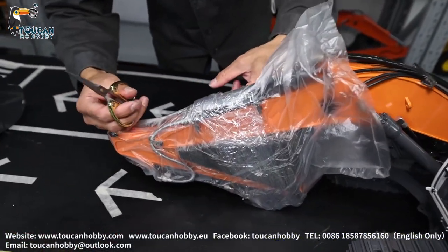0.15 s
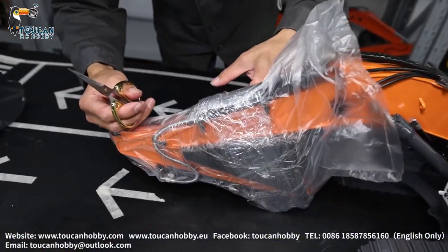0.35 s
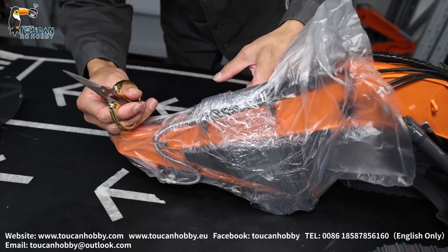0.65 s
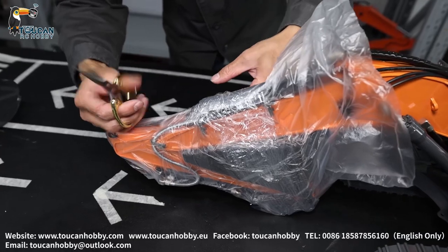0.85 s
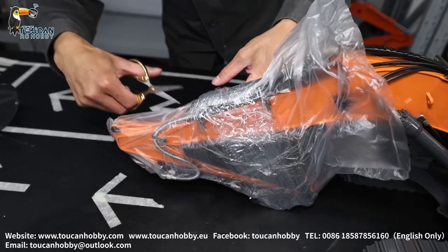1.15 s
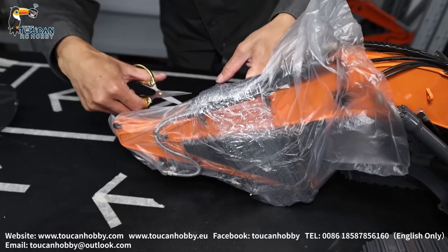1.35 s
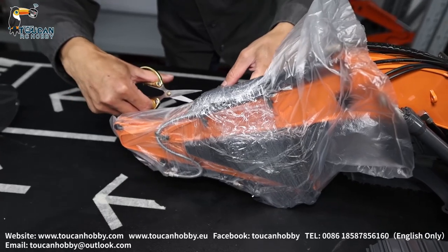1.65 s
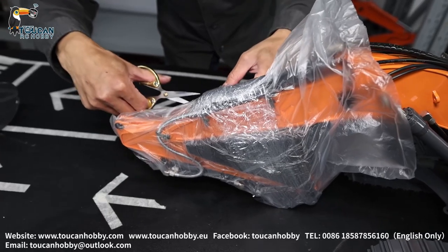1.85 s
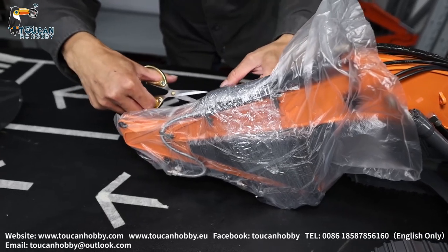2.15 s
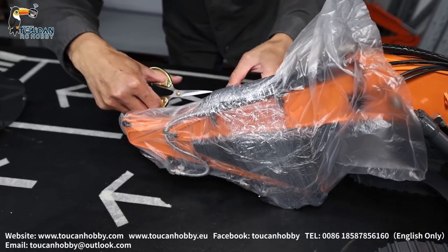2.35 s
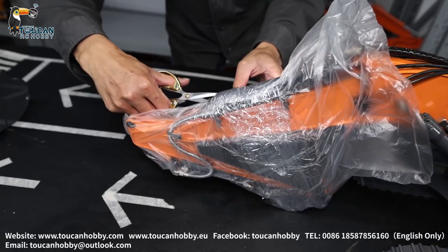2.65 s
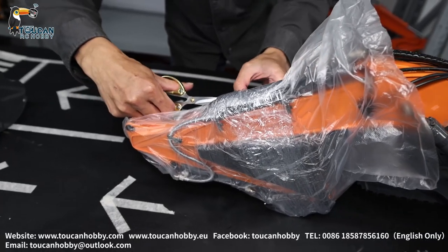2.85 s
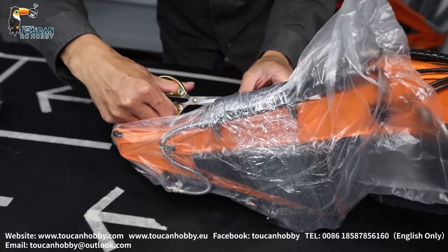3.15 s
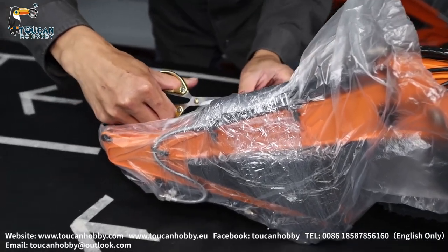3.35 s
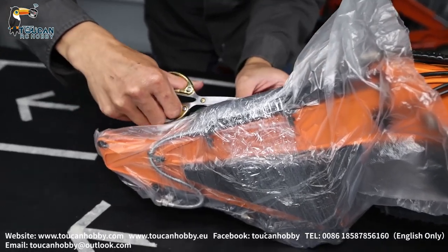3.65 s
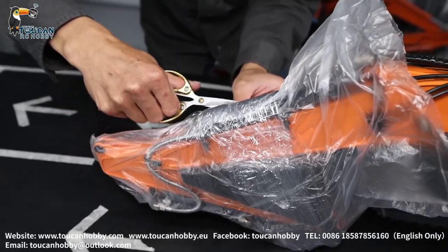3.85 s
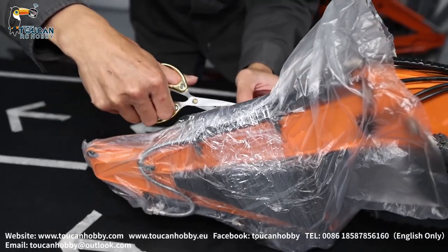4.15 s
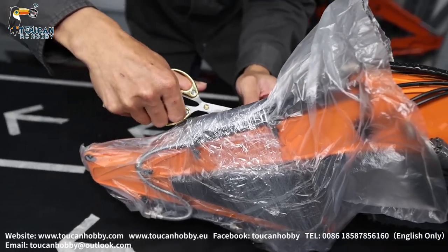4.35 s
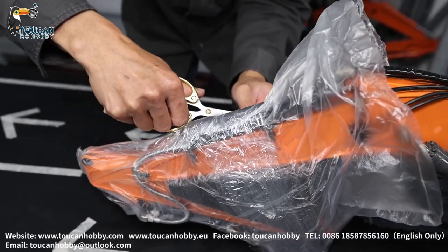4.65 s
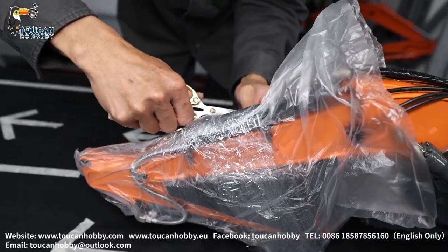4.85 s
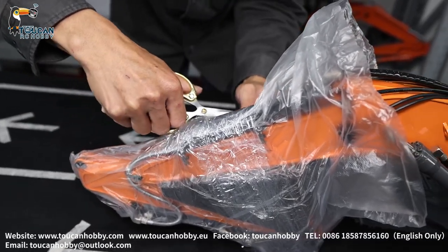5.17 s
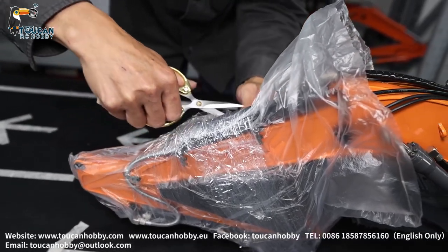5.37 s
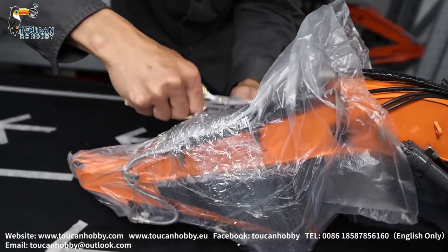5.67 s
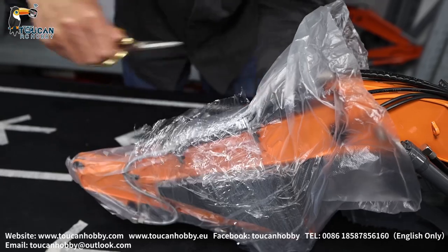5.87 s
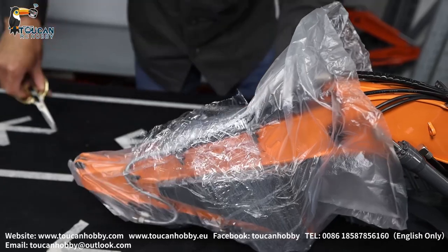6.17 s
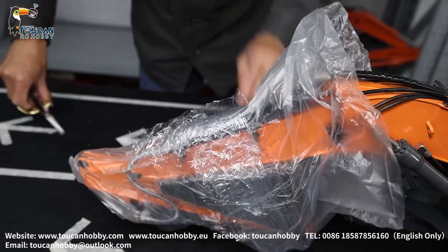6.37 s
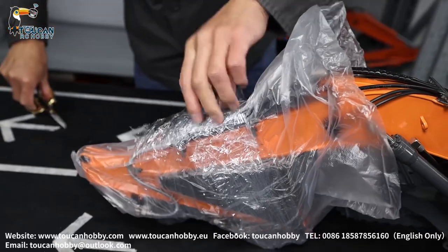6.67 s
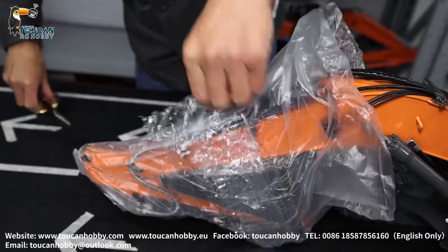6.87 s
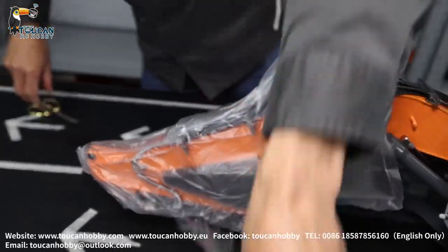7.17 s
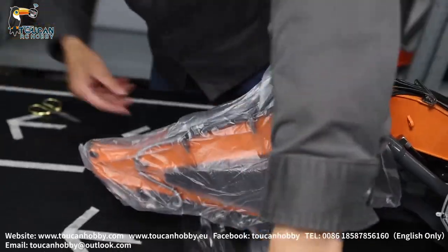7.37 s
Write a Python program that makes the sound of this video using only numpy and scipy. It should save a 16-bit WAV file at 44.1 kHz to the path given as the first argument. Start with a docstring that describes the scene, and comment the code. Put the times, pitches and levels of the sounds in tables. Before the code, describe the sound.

Very close, thin plastic film crackles over a hollow plastic shell in dense swarms of tiny bright snaps, with sharper pops and a few dull knocks. Past the middle, scissor blades clack shut and the loose film rattles. Near the end a palm drags the wrap with a low, short, sinking groan. Small workshop, faint tail, soft steady noise beneath.

```python
"""Scissors slit thin plastic wrap over a hollow plastic shell: from the start the film crinkles in swarms
of tiny snaps (noise bursts) with a few loud ones, while scissors and knuckles knock on the shell.
Past the middle the blades clack shut (ringing modes) and the loose film rattles. Near the end a palm
drags the wrap with a sinking groan. Rubbing noise, an echo that shifts, a faint room tail, a steady
noise floor and low air movement run throughout."""
import sys
import numpy as np
from scipy import signal
from scipy.fft import rfft, irfft, next_fast_len
from scipy.io import wavfile
from scipy.ndimage import uniform_filter1d, map_coordinates

SR = 44100
rng = np.random.default_rng(int(sys.argv[2]) if len(sys.argv) > 2 else 0)


def log_audio(samples):
    """Write samples as a 16-bit WAV file to the path given in sys.argv[1]."""
    # one column per channel
    frames = np.atleast_2d(samples).T
    # limit to full scale, then quantise
    limited = np.clip(frames, -1, 1)
    pcm = np.round(limited * 32767).astype(np.int16)
    wavfile.write(sys.argv[1], SR, pcm)


N = 331632
TIME = np.arange(N) / SR


# colour of the crinkling film [f/Hz, relative level/dB]
FILM_COLOUR = [(300, -8.5), (1000, -9), (1500, -5), (2100, -5), (3000, -2), (5000, -1.5), (7500, -1),
               (10000, -3.5), (12500, -6.5), (16000, -12.5)]
# balance of crease sizes [t/s, broad level/dB, fine level/dB], before the mix; middle creases are at 0
CREASE_BALANCE = [(0, -5.5, 0.5), (.44, -5.5, -1.5), (1.19, -3.5, 0), (1.95, -2.5, 0), (2.12, 2.5, 3.5),
                  (2.7, -5.5, 3.5), (2.89, 1.5, -1), (3.1, -10.5, 0.5), (4.05, 0.5, 3.5), (4.29, -8.5, 1),
                  (4.46, 3, -2), (5.1, -6.5, 2), (6.13, -9, 2.5), (6.58, 2, -.5), (6.73, -1, 1),
                  (6.93, 6.5, 12.5), (7.05, 6.5, 5.5), (7.52, -0.5, -1.5)]
# stretched pleat that rings under blade and fingers [t/s, f/Hz, level/dB against the middle creases]
PLEAT_RINGING = [(0, 3680, -7), (.95, 3200, -11.5), (1.35, 2290, -2.5), (1.6, 2880, -7), (2.6, 2730, -2),
                 (3.3, 2510, -6.5), (4.5, 2940, -11), (4.85, 3670, -6), (5.5, 3700, 1), (6.5, 3560, -5.5),
                 (6.98, 3200, -36), (7.035, 2406, 8), (7.1, 2190, 0), (7.5, 2320, -17)]
# whisper of steel or skin along taut film [t/s, f/Hz, level/dB against the middle creases]
TAUT_WHISPER = [(0, 5330, -10), (.45, 6000, -7), (.65, 8500, -21), (1.0, 9800, 4), (1.6, 10150, 0),
                (2.0, 10300, 4.5), (2.4, 10600, -15), (3.1, 5600, -11), (3.55, 5300, -6.5),
                (4.2, 4600, -11.5), (4.6, 4430, -27), (6.6, 6500, -11), (6.74, 7360, 7.5),
                (6.95, 10500, -5), (7.4, 7600, 0)]


def crinkle(snaps, level_db, own_share):
    """Broad creases sound low, fine ones high; some snaps reach all sizes, others only one."""
    share = np.clip(own_share, 0, 1)

    def creases(hz, kind):
        """Snaps of one size of crease: filtered film noise under a shared and a private envelope."""
        own = swarm(per_s=1100, spread_db=5.0, clump_db=4.0, fade_s=0.00046, smooth_share=0.021)
        echoed = glance(noise(FILM_COLOUR), scale=0.5)
        colour = evened(passed(echoed, hz, kind, order=4), size=4000)
        return colour * np.sqrt((1 - share) * snaps ** 2 + share * own ** 2)

    broad, fine = from_db(in_time(CREASE_BALANCE))
    pleat_hz, pleat_db = in_time(PLEAT_RINGING)
    whisper_hz, whisper_db = in_time(TAUT_WHISPER)
    pleat, whisper = from_db(pleat_db), from_db(whisper_db)
    # the stronger snaps set the pleat ringing most, and its pitch shifts as it folds
    folding = 1 + .07 * rms_one(passed(rng.standard_normal(N), 50, "low"))
    struck_pleat = snaps ** 1.5 * noise(FILM_COLOUR)
    ringing = evened(gliding(struck_pleat, pleat_hz * folding, width_hz=550), size=3000)
    sliding = rms_one(gliding(snaps * noise(FILM_COLOUR), whisper_hz, width_hz=1300))
    voice = broad * creases(4240, "low")
    voice = voice + creases([4500, 8500], "band")
    voice = voice + 0.92 * fine * creases(9060, "high")
    voice = voice + pleat * ringing + whisper * sliding
    # keep the level steady as the balance changes
    balance = np.sqrt(1 + broad ** 2 + (1.015 * fine) ** 2 + pleat ** 2 + whisper ** 2)
    return from_db(strain() + level_db) * voice / balance


def swarm(per_s, spread_db, clump_db, fade_s, smooth_share):
    """Envelope of tiny snaps: they come in clumps, vary widely in size and die at once."""
    clumps = from_db(clump_db * rms_one(passed(rng.standard_normal(N), 60, "low")))
    # film that is barely worked gives few, separate snaps; worked hard, they run together
    activity = from_db(.9 * (strain() + 46))
    born = rng.random(N) < per_s * activity * clumps / SR
    sizes_db = spread_db * np.minimum(rng.exponential(1, N), 4)
    energy = born * from_db(sizes_db) ** 2
    power = signal.lfilter([1], [1, -np.exp(-1 / (fade_s * SR))], energy + 1e-12)
    share = np.clip(smooth_share, 0, 1)
    return np.sqrt(share + (1 - share) * evened(np.sqrt(power), size=2600) ** 2)


# steady pull on the film between the pushes [t/s, crinkle level/dB before the mix]
STEADY_PULL = [(0.0, -43.5), (0.5, -50.5), (0.62, -51.5), (0.73, -45.5), (1.48, -44), (1.52, -57.5),
               (2.1, -51), (2.25, -58), (2.54, -46.5), (2.71, -53.5), (3.28, -49.5), (3.75, -55),
               (4.27, -54), (5.46, -61.5), (6.65, -77), (7.27, -47.5), (7.51, -59)]
# pushes of scissors or hand that flex the film [peak t/s, level/dB before the mix, rise/s, fall/s]
FLEX_PUSHES = [(0.101, -41.5, 0.018, 0.065), (0.296, -40, 0.054, 0.085), (0.955, -41, 0.037, 0.046),
               (1.081, -41.5, 0.025, 0.076), (1.745, -39.5, 0.15, 0.16), (1.988, -46, 0.055, 0.017),
               (2.205, -49, 0.017, 0.053), (2.427, -39, 0.035, 0.04), (2.835, -46, 0.031, 0.13),
               (3.15, -41, 0.023, 0.068), (3.583, -44, 0.13, 0.056), (3.898, -43, 0.024, 0.05),
               (4.082, -49, 0.078, 0.057), (4.611, -49.5, 0.23, 0.081), (4.822, -39.5, 0.02, 0.068),
               (5.069, -48, 0.11, 0.03), (5.152, -51.5, 0.015, 0.07), (5.292, -47.5, 0.048, 0.073),
               (5.703, -45.5, 0.1, 0.22), (5.797, -41, 0.013, 0.45), (6.107, -38, 0.067, 0.19),
               (6.414, -46, 0.025, 0.042), (6.757, -46.5, 0.035, 0.075), (7.033, -42, 0.14, 0.11),
               (7.445, -46, 0.07, 0.084)]


def strain():
    """How hard the film is worked, as crinkle level in dB: pushes on top of the steady pull."""
    return swells(FLEX_PUSHES, in_time(STEADY_PULL)[0])


# glancing echo from hand and shell [t/s, delay/ms, strength 0-1 before scaling]
GLANCING_ECHO = [(0, 0.19, 0.57), (.5, 0.15, 0.55), (1.2, .116, 0.48), (2.1, .11, 0.45), (2.6, 0.12, 0.33),
                 (3.2, 0.15, 0.56), (3.7, 0.18, 0.5), (4.2, .2, 0.33), (5.0, 0.26, 0.1), (5.6, 0.24, 0.33),
                 (6.2, 0.33, 0.75), (6.65, 0.24, 0), (7.15, 0.27, 0.4), (7.5, .26, 0)]


def glance(x, scale):
    """Add the echo off hand and shell: a comb whose teeth slide as the cut moves on."""
    delay_ms, strength = in_time(GLANCING_ECHO)
    strength = scale * strength
    echo = map_coordinates(x, [np.arange(N) - delay_ms * SR / 1000], order=3, mode="nearest")
    return (x + strength * echo) / np.sqrt(1 + strength ** 2)


def crackles(level_db, flutter_s, flutter_db, width):
    """A taut crease flips with a sharp snap; the sheet flutters briefly and the pleat rings along."""
    out, t = np.zeros(N), TIME[:700]
    fade = np.exp(-t / .0004) + from_db(flutter_db) * np.exp(-t / flutter_s)
    envelope = (1 - np.exp(-t / .0003)) * fade
    grit = rng.choice([-1, 1], (400, len(t)))
    for (s, db, hz), white in zip(snapping(), grit):
        band = [hz / width, min(hz * width, 11500)]
        snap = signal.lfilter(*signal.butter(1, band, "band", fs=SR), white * envelope)
        first_3_ms = np.sqrt(np.mean(snap[:132] ** 2))
        add(out, s, from_db(db + level_db) * snap / first_3_ms)
    out = passed(out, 690, "high")
    pleat = gliding(out, in_time(PLEAT_RINGING)[0], width_hz=700)
    return glance(out, scale=.9) + from_db(-2) * pleat


# loudest single creases snapping through [t/s, level/dB over 3 ms before the mix, centre f/Hz]
LOUD_SNAPS = [(.285, -35, 5700), (0.3053, -32.5, 6800), (.4573, -40, 5740), (.5092, -37.5, 7800),
              (0.648, -38, 6900), (.726, -31.5, 1790), (0.7278, -33.5, 3400), (.947, -36, 6900),
              (1.2407, -41, 5000), (1.3184, -35, 5700), (1.3325, -35, 3000), (1.381, -32.5, 4300),
              (1.47, -32, 6150), (1.7404, -24, 7400), (1.7422, -25, 7100), (1.867, -38.5, 3300),
              (1.9498, -37.5, 7900), (2.053, -43, 6000), (2.3762, -32.5, 2580), (2.3945, -34.5, 4900),
              (2.418, -30.5, 6800), (2.4257, -29, 6200), (2.433, -33, 6400), (2.441, -37, 6000),
              (2.5194, -32, 7600), (2.553, -34, 7800), (2.558, -30.5, 5400), (2.5856, -30.5, 4570),
              (2.5964, -34, 4500), (2.6348, -35, 7000), (2.648, -34.5, 6000), (2.744, -34.5, 5050),
              (2.78, -34.5, 4180), (2.8087, -40.5, 5900), (3.1385, -33.5, 5230), (3.483, -33.5, 5300),
              (3.4977, -38, 6600), (3.5349, -31, 5130), (3.775, -40, 3930), (3.8615, -40.5, 7900),
              (3.885, -39.5, 6500), (3.8906, -31.5, 5300), (3.9253, -37.5, 6300), (4.0674, -35, 4430),
              (4.091, -36, 6050), (4.1082, -39.5, 5000), (4.1584, -33, 6040), (4.7975, -35.5, 6900),
              (4.8054, -34, 7800), (4.8252, -29.5, 4500), (4.84, -34.5, 5600), (4.855, -33.5, 4500),
              (4.8833, -34.5, 5260), (5.078, -40.5, 6470), (5.1902, -39.5, 7050), (5.2568, -37.5, 4100),
              (5.3457, -41, 6070), (5.6675, -36.5, 4500), (5.676, -33, 4265), (5.6929, -29.5, 5200),
              (5.6993, -30, 6300), (5.915, -33, 7650), (6.1518, -33, 6700), (6.158, -38, 7800),
              (6.3053, -39.5, 7200), (6.4162, -39.5, 5200), (6.9659, -38.5, 7800), (7.034, -32, 2200),
              (7.369, -42, 6900)]
# lesser snaps at random: mean rate, mean level over the crinkle, spread, middle pitch
STRAY_PER_S, STRAY_OVER_CRINKLE_DB, STRAY_SPREAD_DB, STRAY_HZ = 11, 5.5, 1.5, 6300
STRAY_FOLLOWS = .8   # share of the crinkle's swing in level that the stray snaps follow
FOLLOW_S, FOLLOW_DB = .008, -7.5   # neighbouring crease: longest wait, level against the first


def snapping():
    """Rows (s, dB, Hz): the loud snaps, the neighbour that each one tips over, and stray lesser ones."""
    loud = np.array(LOUD_SNAPS)
    waits = rng.uniform(.2, 1, (len(loud), 1)) * [FOLLOW_S, 0, 0]
    followers = loud + [0, FOLLOW_DB, 0] + waits
    at = np.flatnonzero(rng.random(N) < STRAY_PER_S / SR)
    size, pitch = rng.standard_normal((len(at), 2)).T
    strain_db = strain()
    mean_db = strain_db.mean()
    stray_db = mean_db + STRAY_FOLLOWS * (strain_db[at] - mean_db) + STRAY_OVER_CRINKLE_DB
    stray_db = stray_db + STRAY_SPREAD_DB * size
    strays = np.transpose([TIME[at], stray_db, STRAY_HZ * 2 ** (.25 * pitch)])
    return np.vstack([loud, followers, strays])


# blades clacking shut [t/s, level/dB before the mix, treble tilt/dB per octave, pitch factor,
# ring length factor, f/Hz favoured by the spot they hit]
BLADE_CLACKS = [(4.2394, -15.5, -1.5, 1.026, 0.63, 1380), (4.3356, -24.5, -1.8, 1.06, 0.62, 1330),
                (4.4897, -35, -1.5, 0.97, 1.4, 547), (5.2895, -15, -3.5, 0.987, 1.08, 770),
                (5.693, -34, -0.5, 0.96, 1.4, 620)]
# ringing of scissors pressed on the shell [f/Hz, level/dB, t60/s], before each clack's own factors
BLADE_MODES = [(470, -6.5, 0.0073), (688, -4, 0.023), (1313, -2, 0.017), (1930, -12, 0.0055),
               (2540, -9, 0.018), (3280, -1, 0.0064), (3840, 4.5, 0.0049), (4660, 8.5, 0.0058),
               (5770, 1.5, 0.0086), (7860, -10, 0.0031), (9350, -6.5, 0.0081), (12700, -7.5, 0.0036)]
# colour of the loose film's rattle [f/Hz, relative level/dB]
RATTLE_COLOUR = [(200, -29), (450, -21), (680, 13.5), (950, 1), (1300, -1), (1900, -2), (3000, -10),
                 (8000, -24)]


def snips(level_db, accent_db, rattle_db, rattle_s):
    """The blades clack together; the loose film rattles on the shell with them and rings on after."""
    out, t = np.zeros(N), TIME[:10000]
    hz, mode_db, t60 = np.transpose(BLADE_MODES)
    for s, db, tilt_db, pitch, length, spot_hz in BLADE_CLACKS:
        favoured = accent_db * np.exp(-(np.log2(hz / spot_hz) / 1.02) ** 2)
        modes = np.transpose([hz, mode_db + favoured, t60])
        clack = struck(modes, tilt_db, pitch, length, contact_db=1, contact_s=0.0033, count=2)
        loose_film = shaped(rng.standard_normal(len(t)), RATTLE_COLOUR)
        rattle = rms_one(passed(loose_film, [spot_hz / 1.3, spot_hz * 2.8], "band", order=1))
        add(out, s, from_db(db + level_db) * clack)
        add(out, s, from_db(db + rattle_db) * rattle * np.exp(-t / rattle_s))
    return passed(out, 170, "high")


# dull knocks on the shell [t/s, level/dB before the mix, treble tilt/dB per octave, pitch factor]
SHELL_KNOCKS = [(.131, -36, -4.5, 1.1), (0.139, -37.5, -7, 2), (.357, -43.5, -12, 1.34),
                (0.7255, -21.5, -2, 1.11), (0.7296, -27, -2, 0.63), (1.7401, -25, -4.5, 0.79),
                (1.743, -27, -8.5, 0.33), (1.7515, -33.5, 6, 0.98), (2.3764, -20.5, -3.5, 0.93),
                (2.4155, -34.5, -7, 0.88), (2.421, -35, 0, 0.92), (3.139, -32.5, 1.5, 1.22),
                (3.891, -37.5, 4, 0.97), (4.2391, -24.5, -4, 0.86), (5.699, -42, 7, 1.1),
                (5.913, -39, -4.5, 1.5), (6.416, -40, -9, 1.13), (6.733, -36.5, -8, 0.39),
                (7.114, -34.5, -8, 0.66), (7.186, -30, -7.5, 0.8)]
# ringing of the hollow shell under the film [f/Hz, level/dB, t60/s], before each knock's own factors
HOLLOW_MODES = [(334, -7.5, 0.02), (514, 2.5, 0.02), (747, 1, 0.019), (1220, 1, 0.0086),
                (1500, -0.5, 0.027), (2074, 0.5, 0.028), (2830, 17, 0.0011)]


def knocks(level_db, lowest_hz):
    """Scissors and knuckles bump the shell through the film; little radiates below its first mode."""
    out = np.zeros(N)
    for s, db, tilt_db, pitch in SHELL_KNOCKS:
        bump = struck(HOLLOW_MODES, tilt_db, pitch, 0.92, contact_db=-20, contact_s=0.0031)
        add(out, s, from_db(db + level_db) * passed(bump, lowest_hz * pitch, "high"))
    return out


def struck(modes, tilt_db, pitch, length, contact_db, contact_s, count=1):
    """Damped modes of one blow, with the brief grit of the contact; the tilt sets how bright it is."""
    t = TIME[:7000]
    hz, db, t60 = np.transpose(modes)[:, :, None]
    signs = (-1) ** np.ceil(np.arange(len(hz)) / count)[:, None]   # modes swap sign in groups
    gain = from_db(db + tilt_db * np.log2(hz / 1000) - 60 * t / (t60 * length))
    rings = np.sum(signs * gain * np.sin(2 * np.pi * hz * pitch * t), axis=0)
    burst = rng.standard_normal(len(t)) * np.exp(-t / (contact_s * length))
    grit = passed(burst, [1500, 9000], "band", order=1)
    return rings + from_db(contact_db + 2 * tilt_db) * grit


# blade and fingers sliding over the shell [peak t/s, level/dB before the mix, rise/s, fall/s]
SHELL_SLIDES = [(.02, -61, .05, 0.16), (.31, -60, .05, 0.13), (.74, -51.5, 0.15, 0.19),
                (1.76, -56.5, .08, 0.22), (2.86, -52.5, .06, .2), (3.58, -53.5, 0.18, .13),
                (4.635, -49.5, 0.14, 0.14), (5.8, -50.5, 0.13, 0.14), (6.25, -57, 0.09, 0.31),
                (6.78, -55.5, 0.097, 0.18), (7.055, -45.5, 0.018, 0.019), (7.13, -51.5, 0.037, 0.17),
                (7.48, -59.5, .15, 0.11)]
# colour of the rubbing [f/Hz, relative level/dB]
RUBBING_COLOUR = [(150, -9.5), (300, -3), (480, -2.5), (700, 1.5), (1000, -3), (1350, -1.5), (1800, -10),
                  (2600, -23)]
CONTACT_DB = -62.5   # light rubbing that goes on between the slides, before the mix
RUB_UNDER_CRINKLE_DB = -16   # flexed film also rubs on the shell, before the mix


def rubbing(snaps, scrape):
    """Sliding and flexing rub the shell: dull noise made rough by the scrape and the film's snaps."""
    slides = from_db(swells(SHELL_SLIDES, CONTACT_DB))
    flexed = from_db(strain() + RUB_UNDER_CRINKLE_DB)
    roughness = np.sqrt(.5 * (scrape ** 2 + snaps ** 2))
    return from_db(-2.0) * np.hypot(slides, flexed) * noise(RUBBING_COLOUR) * roughness


# the palm lands on the wrap and drags it [peak t/s, level/dB before the mix, rise/s, fall/s]
PALM_DRAGS = [(7.197, -44.5, 0.017, 0.099)]
# colour of the dragging rumble [f/Hz, relative level/dB]
DRAGGING_COLOUR = [(50, -26), (100, -4), (190, 1.5), (330, -3), (460, -3.5), (700, -10), (1100, -9),
                   (2000, -44)]
DRAG_HZ, DRAG_END_HZ, DRAG_SLOWS_S = 516, 220, 0.052   # groan: start, end, time constant of the fall


def dragging(scrape):
    """The palm hauls the wrap over the shell: a low rumble, and a groan that sinks as the palm slows."""
    since = np.maximum(TIME - PALM_DRAGS[0][0], 0)
    hz = DRAG_END_HZ + (DRAG_HZ - DRAG_END_HZ) * np.exp(-since / DRAG_SLOWS_S)
    groan = evened(gliding(rng.standard_normal(N), hz, width_hz=91), size=900)
    rumble = noise(DRAGGING_COLOUR) * scrape
    level = from_db(swells(PALM_DRAGS, under_db=-95))
    return level * (from_db(-3.0) * rumble + from_db(-5) * groan)


# colour of the room's tail [f/Hz, relative level/dB]
TAIL_COLOUR = [(100, -11), (350, 3.5), (650, -0.5), (1300, -2.5), (2200, 4.5), (5000, -8), (16000, -24)]


def workshop(x, t60, wet_db, gap_s):
    """A faint diffuse tail that builds up after the direct sound."""
    t = TIME[:24000]
    build_up = 1 - np.exp(-(t / gap_s) ** 2)
    tail = shaped(rng.standard_normal(len(t)), TAIL_COLOUR) * from_db(-60 * t / t60) * build_up
    return from_db(wet_db) * signal.fftconvolve(x, tail / np.sqrt(np.sum(tail ** 2)))[:N]


# detailed colour of the steady noise floor [f/Hz, relative level/dB]
FLOOR_COLOUR = [(12, -36), (20, -15), (113, -3), (255, 1), (328, -4), (499, -0.5), (1060, -18.5),
                (1290, -6.5), (1860, -7.5), (3250, -1), (7520, -18), (12400, -16), (16000, -6)]
# broad tilt of the steady noise floor: fuller lows, softer treble [f/Hz, relative level/dB]
FLOOR_TILT = [(20, 4.5), (400, 4), (900, 1.5), (2500, -8), (16000, -21)]


def noise_floor(level_db):
    """Steady background noise, the same on both sides."""
    return from_db(level_db) * rms_one(shaped(noise(FLOOR_COLOUR), FLOOR_TILT))


# colour of the low air movement [f/Hz, relative level/dB]
AIR_COLOUR = [(20, -6.5), (45, -1.5), (90, -6.5), (200, -10.5), (500, -18.5), (2000, -50.5)]


def air_movement(level_db):
    """Low moving air: separate noise on the left and right."""
    return from_db(level_db) * np.array([noise(AIR_COLOUR), noise(AIR_COLOUR)])


STROKE_SHAPE = 1.186   # 1 = exponential swell and fade; above 1 a stroke is rounder and ends sooner


def swells(rows, under_db):
    """Level in dB of strokes that swell and die away over a given level."""
    t, power = TIME[::44], 0
    for s, db, rise_s, fall_s in rows:
        away = np.maximum((s - t) / rise_s, (t - s) / fall_s)
        power = power + from_db(db) ** 2 * np.exp(-2 * away ** STROKE_SHAPE)
    return 10 * np.log10(np.interp(TIME, t, power) + from_db(under_db) ** 2)


def gliding(x, hz, width_hz):
    """A resonance whose centre moves, stepped block by block; gain about 1 on top."""
    out, state, r = np.zeros(N), np.zeros(2), np.exp(-np.pi * width_hz / SR)
    for i in range(0, N, 128):
        poles = [1, -2 * r * np.cos(2 * np.pi * hz[i] / SR), r * r]
        block = x[i:i + 128] + 1e-18
        out[i:i + 128], state = signal.lfilter([1, 0, -1], poles, block, zi=state)
    return out * (1 - r * r) / 2


def from_db(db):
    """Decibels to gain."""
    return 10 ** (np.asarray(db) / 20)


def rms_one(x):
    """Scale to rms 1."""
    return x / np.sqrt(np.mean(x ** 2) + 1e-20)


def in_time(rows):
    """Each column of a curve at every sample."""
    s, *columns = np.transpose(rows)
    return [np.interp(TIME, s, c) for c in columns]


def shaped(x, spectrum):
    """Give a noise the colour of a spectrum."""
    hz, db = np.transpose(spectrum)
    size = next_fast_len(len(x), real=True)
    f = np.arange(size // 2 + 1) * SR / size
    gain = from_db(np.interp(np.log(f + 1), np.log(hz), db))
    return irfft(rfft(x, size) * gain, size)[:len(x)]


def noise(spectrum):
    """Coloured noise of rms 1."""
    return rms_one(shaped(rng.standard_normal(N), spectrum))


def passed(x, hz, kind, order=2):
    """Butterworth filter."""
    edges = np.clip(hz, 10, SR / 2 - 500)
    return signal.sosfilt(signal.butter(order, edges, kind, fs=SR, output="sos"), x)


def evened(x, size):
    """Hold the running rms at 1."""
    return x / np.sqrt(np.abs(uniform_filter1d(x ** 2, size)) + 1e-12)


def add(out, s, sound):
    """Mix a short sound in at time s."""
    start = int(np.clip(round(s * SR), 0, N - 1))
    out[start:start + len(sound)] += sound[:N - start]


def scene():
    """All handling sits in the middle; only the low air movement differs between the sides."""
    snaps = swarm(per_s=1000, spread_db=2.5, clump_db=4, fade_s=0.00084, smooth_share=0.34)
    scrape = swarm(per_s=350, spread_db=1.5, clump_db=2.5, fade_s=0.0046, smooth_share=0.16)
    hands = crinkle(snaps, level_db=-0.56, own_share=0.47)
    hands = hands + crackles(level_db=-1.4, flutter_s=0.0017, flutter_db=-11.5, width=1.94)
    hands = hands + snips(level_db=-2.0, accent_db=5.5, rattle_db=-30.5, rattle_s=0.058)
    hands = hands + knocks(level_db=-7.5, lowest_hz=231)
    hands = hands + rubbing(snaps, scrape) + dragging(scrape)
    room = workshop(hands, t60=0.4, wet_db=-21, gap_s=0.0021)
    return hands + room + noise_floor(level_db=-62) + air_movement(level_db=-67.5)


def record(dry):
    """The top is cut steeply above 16 kHz."""
    return signal.sosfilt(signal.ellip(12, .1, 80, 16000, fs=SR, output="sos"), dry)


dry = scene()
out = record(dry)
log_audio(out)
```